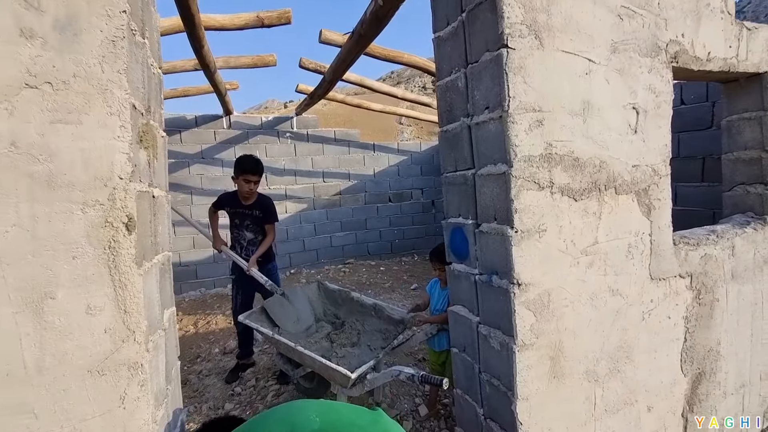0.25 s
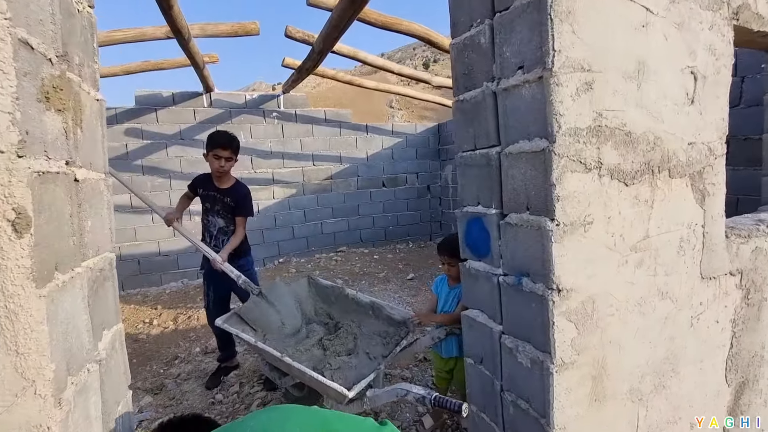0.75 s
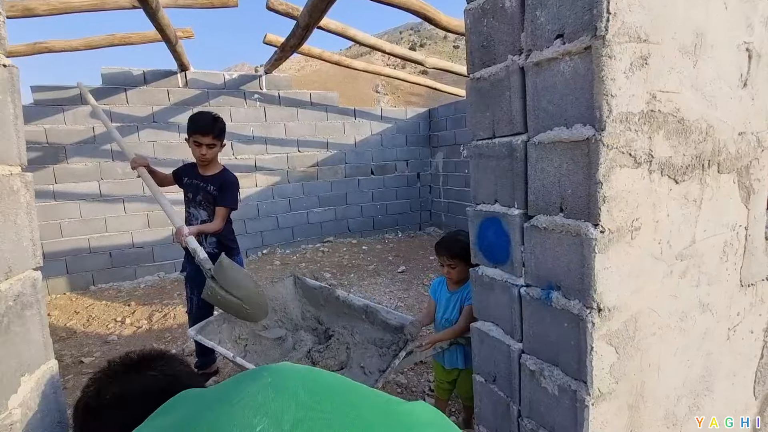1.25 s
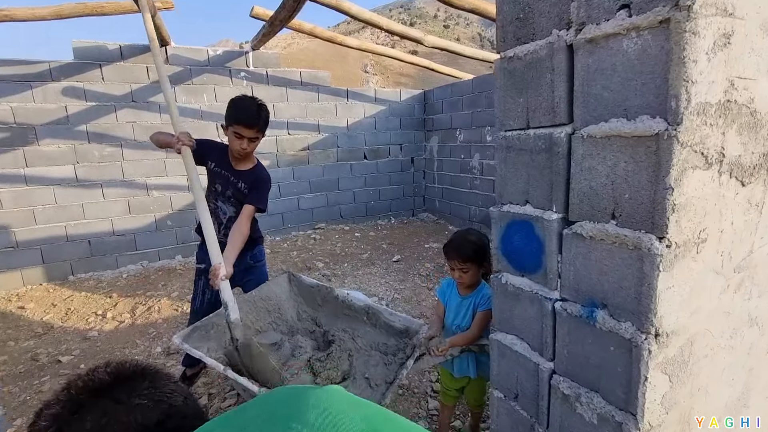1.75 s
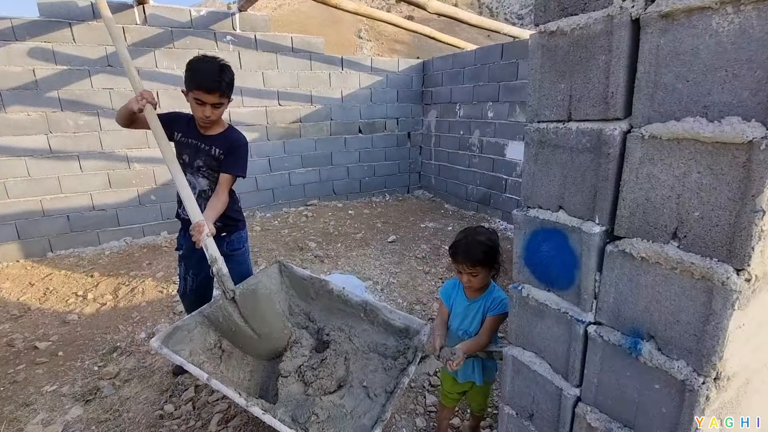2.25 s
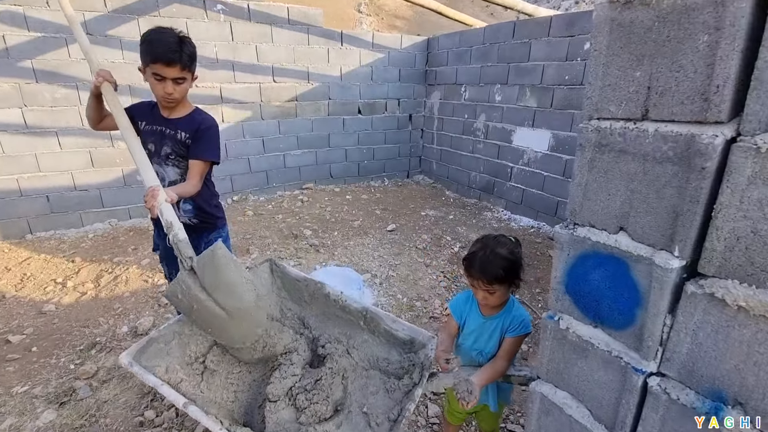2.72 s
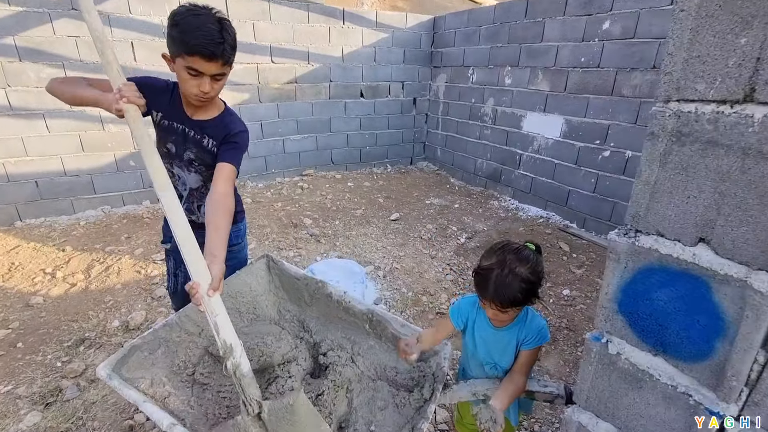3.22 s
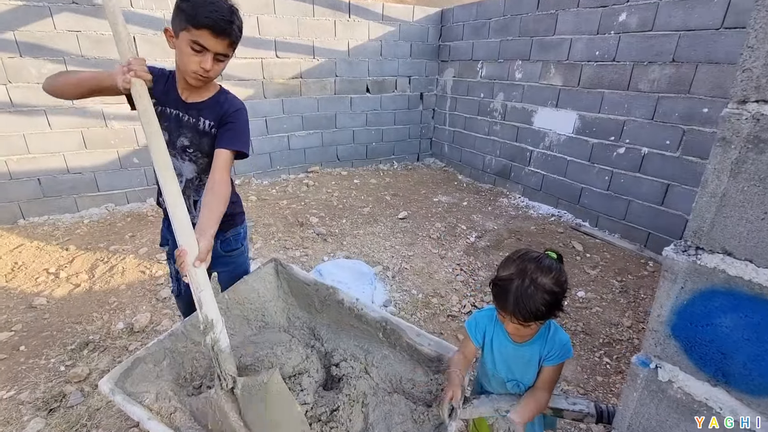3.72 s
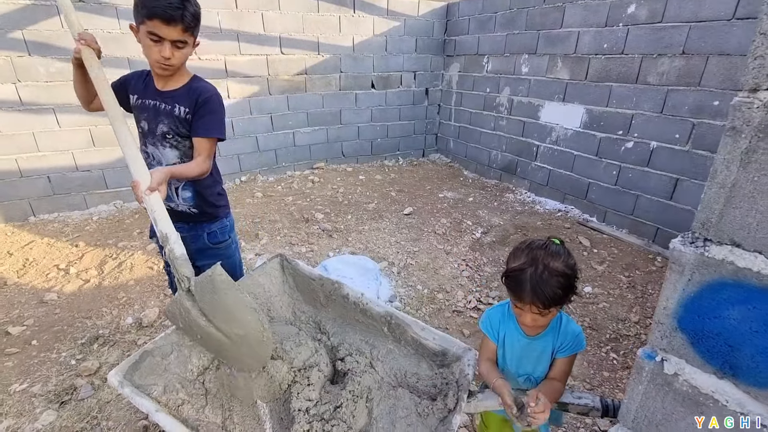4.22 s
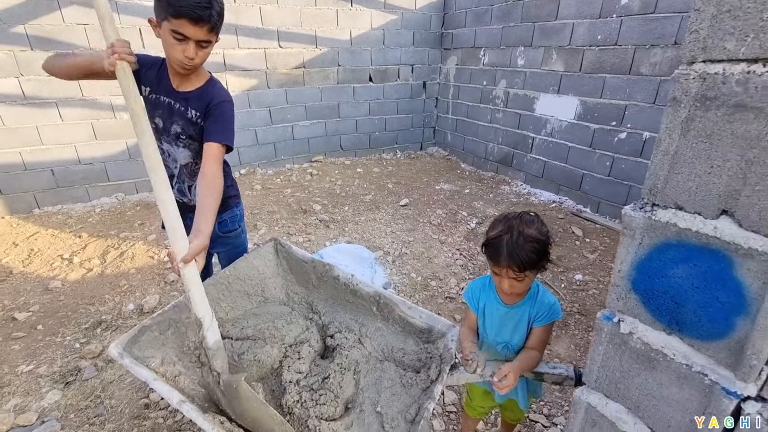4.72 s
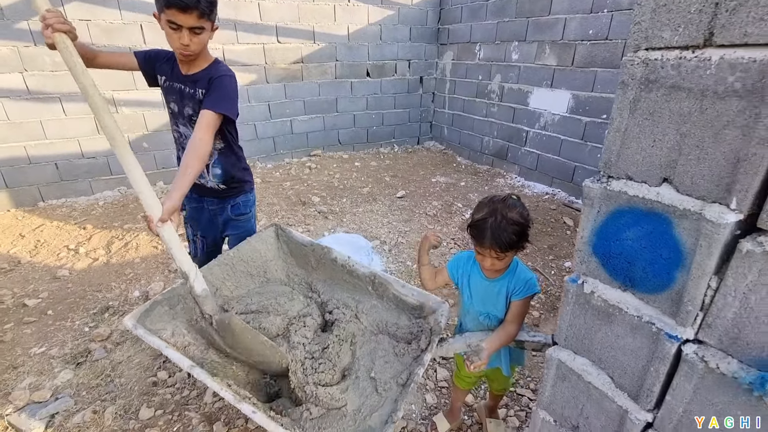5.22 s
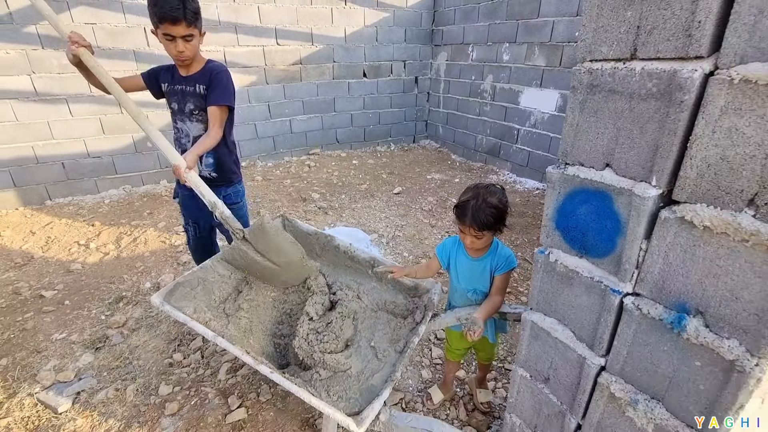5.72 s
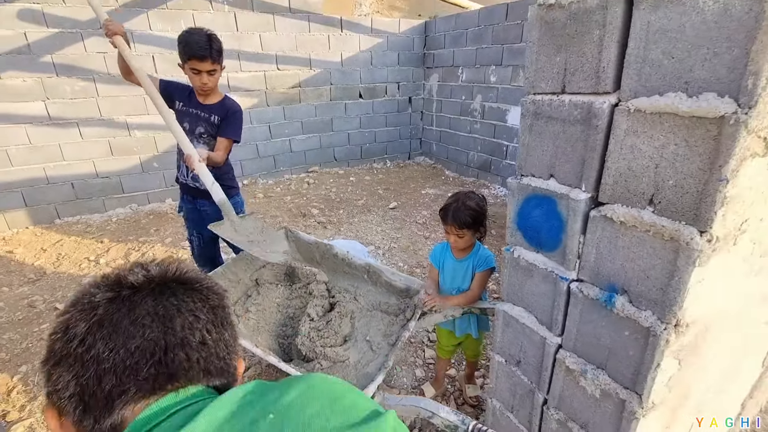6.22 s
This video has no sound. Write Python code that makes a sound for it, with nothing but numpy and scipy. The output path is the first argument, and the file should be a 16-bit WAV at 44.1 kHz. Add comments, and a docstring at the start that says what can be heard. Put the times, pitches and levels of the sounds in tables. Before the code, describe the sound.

Wet mortar is scooped and scraped in a metal tray in a walled yard, gravelly crunches broken by sharp clanks and a final singing scrape.

```python
"""A shovel and a trowel work wet cement in a steel wheelbarrow in a walled, roofless yard.
Strokes: random grains of stone and sand grind under the blade and shake the damped tray modes.
The bare blade squeals, rasps and sings when dragged; noise bursts through the tray modes make knocks;
smooth pulses through the lowest modes make thuds. Pebbles snap and a faint tone hoots from afar,
over a low rumble that surges with the blow at 3.1 s and hiss at a two-port microphone."""
import sys
import numpy as np
from scipy import signal
from scipy.fft import rfft, irfft
from scipy.io import wavfile
from scipy.ndimage import uniform_filter1d

SR = 44100
rng = np.random.default_rng(int(sys.argv[2]) if len(sys.argv) > 2 else 0)


def wrap_up_sound(samples):
    """Save the sound to the file named by the first command line argument, as 16-bit audio."""
    columns = np.atleast_2d(samples).T
    # keep every value between -1 and 1, then stretch to whole-number steps
    tamed = np.clip(columns, -1, 1)
    steps = np.round(tamed * 32767).astype(np.int16)
    wavfile.write(sys.argv[1], SR, steps)


N = 284886


def amp(db):
    """Amplitude ratio of a level in dB."""
    return 10 ** (np.asarray(db) / 20)


def evened(x):
    """Scale to rms 1."""
    return x / np.sqrt(np.mean(x ** 2) + 1e-20)


def curve(rows, t):
    """Interpolate each column of a table at the times t."""
    time_s, *columns = np.transpose(rows)
    return [np.interp(t, time_s, column) for column in columns]


def above(x, hz):
    """Second-order high-pass."""
    return signal.sosfilt(signal.butter(2, hz, "high", fs=SR, output="sos"), x)


def coloured(x, points):
    """Weight the spectrum of x by a (Hz, dB) table, rms 1."""
    table_hz, table_db = np.transpose(points)
    hz = np.fft.rfftfreq(len(x), 1 / SR)
    gain_db = np.interp(np.log(hz + 1), np.log(table_hz), table_db, -90, -90)
    return evened(irfft(rfft(x) * amp(gain_db), len(x)))


def ring(x, modes, width_hz, tint=lambda hz: 1):
    """Sum of damped resonances, unit gain at the peak before level and tint; higher modes are wider."""
    out = np.zeros(len(x))
    for hz, db in modes:
        mode_width_hz = width_hz * np.sqrt(hz / 1000)
        pole = np.exp((2j * np.pi * hz - np.pi * mode_width_hz) / SR)
        resonance = 2 * signal.lfilter([1 - abs(pole)], [1, -pole], x).imag
        out += tint(hz) * amp(db) * resonance
    return out


def grains(per_s, spread_db):
    """Clicks of random sign and size at random moments, rms 1."""
    size = amp(spread_db * np.minimum(rng.exponential(1, N), 5))
    signed = size * rng.choice([-1., 1.], N)
    return evened(signed * (rng.random(N) < per_s / SR))


def flutter(seconds, depth_db):
    """Random gain, rms depth in dB, that wanders as the mix clumps and slips."""
    size = max(round(seconds * SR), 1)
    smooth = uniform_filter1d(uniform_filter1d(rng.standard_normal(N), size), size)
    return amp(depth_db * evened(smooth))


EDGE_DB = 30  # gained per rise time, lost per fall time


def swells(rows, column, sag_db_per_s):
    """Gain of one layer: each row rises to its peak, sags through its hold, then falls; powers add."""
    t = np.arange(0, N + 16, 16) / SR
    peak_s, rise_s, hold_s, fall_s, db = np.transpose(rows)[[0, 1, 2, 3, column], :, None]
    since = t - peak_s
    rise_db = EDGE_DB * np.minimum(since, 0) / (rise_s + .001)
    sag_db = sag_db_per_s * np.clip(since, 0, hold_s)
    fall_db = EDGE_DB * np.maximum(since - hold_s, 0) / (fall_s + .001)
    power = (amp(db + rise_db - sag_db - fall_db) ** 2).sum(0)
    return np.interp(np.arange(N) / SR, t, np.sqrt(power))


# grain spectra: (frequency [Hz], level [dB])
STONE_SPECTRUM = [(900, -15), (1700, 8), (2800, 12), (4500, 10.5), (7400, 3), (9000, -35.5), (12000, -8.5)]
SAND_SPECTRUM = [(5000, -24.5), (8000, -23), (11500, -30.5), (16500, -24.5)]
# hollow under the tilting blade: (time [s], frequency [Hz], level over the stones [dB])
SCOOP = [(1.06, 3300, -22), (1.15, 3050, -8), (1.27, 2400, -6), (1.32, 2100, -32)]
# cement-laden tray modes: (frequency [Hz], level [dB])
TRAY_MODES = [(290, -8.5), (360, -5), (441, -6.5), (570, -5), (772, 20), (1030, 19.5), (1250, 10),
              (1530, 15.5), (1870, 26), (2300, 17.5), (2850, 16), (3600, 6.5)]
# pushes, stabs, scrapes: (peak time [s], rise [s], hold [s], fall [s], stones [dB], sand [dB],
#   upper tray modes [dB], lower tray modes [dB])
STROKES = [(0.0, 0.011, .0, 0.47, -62.5, -62, -50, -50), (.295, 0.11, 0.33, 0.15, -35.5, -37, -49.5, -52.5),
           (.86, 0.47, 0, 0.54, -58.5, -60.5, -59, -60), (1.16, 0.17, .27, 0.09, -35, -39, -58, -57),
           (1.47, .05, .18, .05, -67, -64, -67, -68), (1.664, .02, 0.097, 0.022, -28, -36, -29, -45),
           (1.841, 0.0027, 0.0054, 0.079, -44.5, -68, -44.5, -77),
           (2.034, 0.38, 0.17, 0.011, -46.5, -42.5, -61.5, -63),
           (2.25, 0.29, 0.35, 0.039, -57, -55, -61, -65.5),
           (2.796, 0.17, 0.036, 0.35, -53.5, -47, -58.5, -59.5),
           (3.073, 0.001, .0, 0.07, -27, -45, -30, -23),
           (3.171, 0.0014, 0.15, 0.17, -63, -44.5, -58.5, -53.5),
           (3.26, 0.14, 0.02, 0.08, -31.5, -43, -35.5, -64),
           (3.62, 0.38, 0.031, 0.33, -46.5, -48, -50.5, -61.5), (3.9, 1, 0, 0.9, -59.5, -56.5, -61, -88.5),
           (4.517, 0.5, 0.094, 0.031, -43, -45.5, -44.5, -58.5),
           (4.664, 0.008, .008, 0.05, -25, -27, -20, -45), (4.692, .025, .009, 0.012, -24, -24, -19, -40),
           (5.064, 0.24, 0.43, 0.22, -56.5, -54.5, -63, -94), (5.408, .004, .085, .05, -57, -54, -56, -75),
           (5.5, 0.01, .14, 0.04, -50, -50, -54, -62), (5.919, 0.6, 0.0067, 0.17, -44, -46, -39, -53.5),
           (6.44, 0.32, 0.085, 0.11, -71, -70, -60.5, -49.5)]
STONE_SAG_DB_PER_S, SAND_SAG_DB_PER_S, TRAY_SAG_DB_PER_S = 46, 54, 15


def strokes():
    """Stones and sand crush under the blade; sparser grains shake the tray."""
    t = np.arange(N) / SR
    crush = grains(9000, spread_db=3.0)
    sand = coloured(grains(20000, spread_db=-4.0), SAND_SPECTRUM)

    hollow_hz, hollow_db = curve(SCOOP, t)
    turn = np.exp(2j * np.pi * np.cumsum(hollow_hz) / SR)  # resonance slides as the blade tilts
    hollow = evened((turn * uniform_filter1d(crush / turn, 130)).real)
    hollow *= (t > SCOOP[0][0]) * (t < SCOOP[-1][0])
    grit = coloured(crush, STONE_SPECTRUM) + amp(hollow_db) * hollow

    shake = grains(1300, spread_db=1.5) * flutter(0.0024, depth_db=3.0)
    # the contact wanders over the tray, so each mode comes and goes
    wander = lambda hz: flutter(0.07, depth_db=3.0)
    low = evened(above(ring(shake, TRAY_MODES[:4], 120, wander), 220))
    high = evened(above(ring(shake, TRAY_MODES[4:8], 430, wander), 690))

    stones = swells(STROKES, 4, STONE_SAG_DB_PER_S) * grit
    fine = swells(STROKES, 5, SAND_SAG_DB_PER_S) * sand
    upper = swells(STROKES, 6, TRAY_SAG_DB_PER_S) * high
    lower = swells(STROKES, 7, TRAY_SAG_DB_PER_S) * low
    return flutter(0.0047, depth_db=1.82) * (stones + fine) + upper + lower


# blade modes: (frequency [Hz], level [dB])
BLADE_MODES = [(843, 4), (864, 5), (902, -2), (1030, -5), (2270, -14), (2650, -13)]
# bare blade on steel: (peak time [s], rise [s], hold [s], fall [s], squeal [dB], rasp [dB])
DRAGS = [(0.0, .01, .07, .05, -51, -60), (.18, .02, .32, .05, -56, -62), (3.98, .1, .15, .2, -60, -64),
         (4.532, .3, .06, .06, -45, -44), (5.292, .008, .0, .2, -59, -54), (5.408, .003, .0, .15, -52, -49),
         (5.505, .01, .12, .15, -46, -46), (5.86, .25, .11, .04, -39, -45)]
# dragged blade catches and rings: (time [s], relative peak level [dB])
JOLTS = [(4.361, -34), (4.485, -30), (5.622, -36) ]
# stutter locks on, blade sings clean: (peak time [s], rise [s], hold [s], fall [s], level [dB])
SINGING = [(5.91, .14, .058, .04, -29)]
BLADE_SAG_DB_PER_S = 3.7


def drags():
    """The bare blade stutters over the steel: its lowest modes squeal and sing, the upper ones rasp."""
    chatter = grains(2500, spread_db=2.2)
    squeal = evened(ring(ring(chatter, BLADE_MODES[1:2], width_hz=110), BLADE_MODES[:3], width_hz=15))
    rasp = evened(ring(chatter * flutter(.012, depth_db=4), BLADE_MODES[3:], width_hz=40))

    catch = np.zeros(N)
    for time_s, db in JOLTS:
        catch[round(time_s * SR)] = amp(db)
    clang = above(ring(catch, BLADE_MODES, width_hz=22), 700)
    clang *= catch.max() / abs(clang).max()

    since = np.arange(N) / SR - SINGING[0][0]
    song = evened(sum(amp(db) * np.cos(2 * np.pi * hz * since) for hz, db in BLADE_MODES[:3]))

    singing = swells(SINGING, 4, 0) * song
    squealing = swells(DRAGS, 4, BLADE_SAG_DB_PER_S) * squeal
    rasping = swells(DRAGS, 5, BLADE_SAG_DB_PER_S) * rasp
    return clang + singing + squealing + rasping


# lowest tray modes: (frequency [Hz], level [dB])
BOOM_MODES = [(71, -2.5), (135, -0.5), (179, 0), (250, -5.5)]
# loaded tray shudders: (peak time [s], rise [s], hold [s], fall [s], boom [dB])
SHUDDERS = [(.84, 0.053, 0.24, 0.37, -49), (1.7, 0.035, 0.011, 0.18, -36.5),
            (3.46, 0.021, 0.088, 0.11, -50.5)]
BOOM_SAG_DB_PER_S, BOOM_REST_DB = 3, -70


def hum():
    """Noise through the low tray modes: a faint steady boom that swells as the loaded tray shudders."""
    noise = rng.standard_normal(N)
    boom = ring(ring(noise, BOOM_MODES[1:], width_hz=320), BOOM_MODES[1:], width_hz=460)
    shudder = swells(SHUDDERS, 4, BOOM_SAG_DB_PER_S)
    return (shudder + amp(BOOM_REST_DB)) * evened(above(boom, 100))


# rumble spectrum: (frequency [Hz], level [dB])
RUMBLE_SPECTRUM = [(20, -51.5), (40, -2.5), (58, 10.5), (80, -3), (110, -1), (160, -30)]
# low rumble before port gains, surging with the blow at 3.1 s: (time [s], level [dB])
RUMBLE = [(0, -44), (1.456, -45), (1.602, -56), (1.771, -47), (3.06, -57), (3.1, -36), (3.4, -56),
          (4.64, -65.5), (6.46, -60.5)]


def rumble():
    """Low noise rumble, partly different at each port; it surges with the blow at 3.1 s."""
    a, b = (coloured(rng.standard_normal(N), RUMBLE_SPECTRUM) for port in range(2))
    level = amp(curve(RUMBLE, np.arange(N) / SR)[0])
    return level * np.array([1.63 * a, 0.61 * a + b])


# blade and trowel on the tray: (time [s], ring peak [dB], crack peak [dB], ring centre [Hz],
#   contact t60 [s])
KNOCKS = [(0.178, -42.5, -34, 850, 0.036), (.365, -31, -55, 400, 0.041), (0.822, -32.5, -43, 1000, 0.034),
          (0.982, -37, -67, 534, 0.083), (1.3, -33.5, -45, 1320, 0.16), (1.664, -19, -6, 587, 0.14),
          (1.682, -18, -10, 940, 0.039), (1.711, -20, -38, 806, 0.15), (1.752, -23, -24.5, 740, 0.11),
          (3.071, -12, -8, 560, .09), (3.169, -33, -46, 400, .04), (3.257, -11.5, -16, 1540, 0.037),
          (3.272, -10, -39, 1500, 0.069), (3.513, -16, -14, 1600, 0.016), (3.629, -32.5, -32, 1830, 0.026),
          (4.662, -10, -15, 1910, 0.07), (4.671, -11.5, -14, 756, 0.095), (4.69, -19, -27, 890, 0.1),
          (5.435, -42, -48, 2650, .05), (5.494, -19, -10, 1500, .018), (6.237, -46.5, -52, 370, 0.18)]
# low booms under three of the knocks, one strong and two faint: (time [s], peak level [dB])
THUDS = [(0.981, -34), (3.07, -15.5), (4.691, -33.5)]


def knocks():
    """A rattling contact rings tray modes near its centre under a crack; smooth pulses boom the lowest."""
    out, t = np.zeros(N + SR), np.arange(SR // 3) / SR
    for time_s, ring_db, crack_db, centre_hz, t60_s in KNOCKS:
        rattle = rng.standard_normal(len(t))
        decay = amp(-60 * t / t60_s)
        contact = rattle * (decay + np.exp(-t / 0.00037))  # hard first touch
        near_centre = lambda hz: 1 / (1 + (np.log2(hz / centre_hz) / 0.17) ** 2)
        body = above(ring(contact, TRAY_MODES, 40 + 10.0 / t60_s, near_centre), 280)
        snap = 2 * (t == 0) + rattle * (np.exp(-t / .001) + .3 * decay)
        crack = above(uniform_filter1d(snap, size=3), 1200)
        blow = amp(ring_db) * body / abs(body).max() + amp(crack_db) * crack / abs(crack).max()
        out[round(time_s * SR):][:len(t)] += blow

    thud = above(ring(t * np.exp(-t / .001), BOOM_MODES, width_hz=30), 85)  # soft push
    for time_s, db in THUDS:
        out[round(time_s * SR):][:len(t)] += amp(db) * thud / abs(thud).max()
    return out[:N]


# far tone: (peak time [s], rise [s], hold [s], fall [s], level [dB])
FAINT_TONE = [(1.42, .1, .19, .05, -69)]
FAINT_HZ = 412


def faint_tone():
    """A narrow band of noise: a soft, wavering far hoot."""
    hoot = ring(rng.standard_normal(N), [(FAINT_HZ, 0)], width_hz=8)
    return swells(FAINT_TONE, 4, 0) * evened(hoot)


# pebble snaps: (time [s], peak level [dB])
TICKS = [(3.3335, -25), (3.927, -35)]


def ticks():
    """Pebbles snap: a few milliseconds of bright, decaying noise."""
    out, t = np.zeros(N), np.arange(600) / SR
    for time_s, db in TICKS:
        snap = np.diff(rng.standard_normal(len(t) + 1)) * amp(-60 * t / 0.024)
        out[round(time_s * SR):][:len(t)] += amp(db) * snap / abs(snap).max()
    return out


# tool position: (time [s], left lead [samples], left over right [dB])
SIDE = [(0, 7.9, 4), (2, 8.5, 1), (4.7, 2.7, 0.5), (6.46, 23.8, 5)]


def ports(x, scatter_rad, right_db=0):
    """The tool is nearer the left port: the right hears it later and softer; right_db tilts its treble."""
    hz, t, z = signal.stft(x, SR, nperseg=512, noverlap=384)
    hz = hz[:, None]
    lead_samples, pan_db = curve(SIDE, t)
    # grains break all along the blade, so the lead shifts from moment to moment and band to band
    spread = uniform_filter1d(rng.standard_normal(z.shape), size=5)
    spread = evened(uniform_filter1d(spread, size=4, axis=0))
    phase = 2 * np.pi * hz * lead_samples / SR + scatter_rad * np.sqrt(hz / 8000) * spread
    right = z * np.exp(-1j * phase) * amp(right_db * hz / 8000 - pan_db)
    late = signal.istft(right, SR, nperseg=512, noverlap=384)[1]
    return amp(4.0) * np.array([x, late[:N]])


def yard(x, t60_low_s=0.21, t60_high_s=0.13, bright_db=7.5):
    """Block walls return sparse reflections; long waves reach both ports alike, the treble dies first."""
    length = SR // 3
    taps = np.zeros((2, length))
    at = np.arange(60, length - 20, 20) + rng.integers(0, 20, (2, (length - 61) // 20))
    np.put_along_axis(taps, at, rng.choice([-1., 1.], at.shape), 1)
    t = np.arange(length) / SR
    dull = signal.sosfiltfilt(signal.butter(2, 900, fs=SR, output="sos"), taps)
    low = dull[0] * amp(-60 * t / t60_low_s)
    high = (taps - dull) * amp(bright_db - 60 * t / t60_high_s)
    tail = low + high
    return signal.fftconvolve(x[None], tail / np.linalg.norm(tail[0]), axes=1)[:, :N]


def scene():
    """Tool sounds direct and off the walls, plus low rumble and microphone hiss."""
    rubbing = strokes() + drags() + hum() + faint_tone()
    blows = knocks() + ticks()
    hiss = amp(-74) * rng.standard_normal((2, N))
    # a blow comes from one spot, its treble leaning right
    direct = ports(rubbing, scatter_rad=3.24) + ports(blows, scatter_rad=.5, right_db=3)
    return direct + amp(-5.0) * yard(rubbing + blows) + rumble() + hiss


EDGE_HZ = 16100


def record(dry):
    """Band limit: linear-phase low-pass."""
    low_pass = signal.firwin(1023, EDGE_HZ, window=("kaiser", 12), fs=SR)
    return signal.oaconvolve(dry, low_pass[None], "same")


dry = scene()
out = record(dry)
wrap_up_sound(out)
```